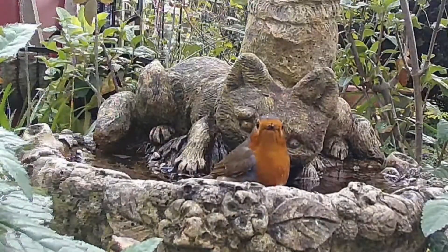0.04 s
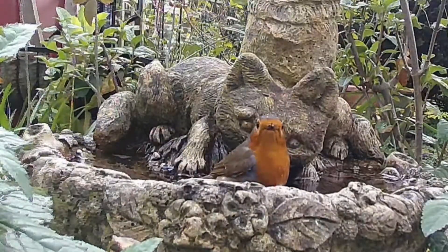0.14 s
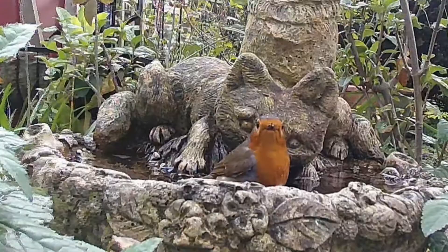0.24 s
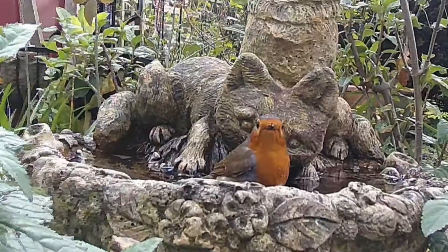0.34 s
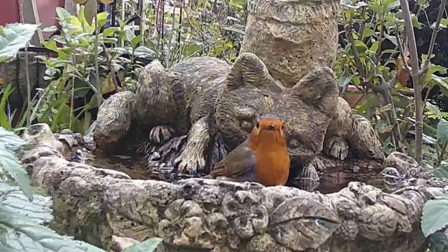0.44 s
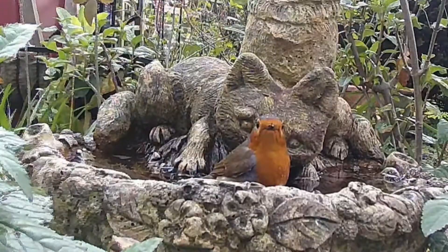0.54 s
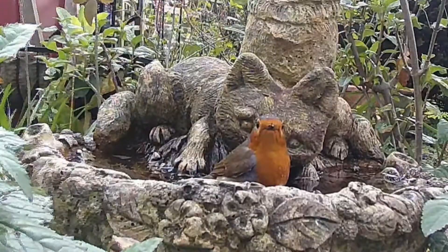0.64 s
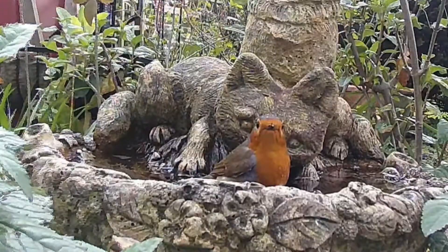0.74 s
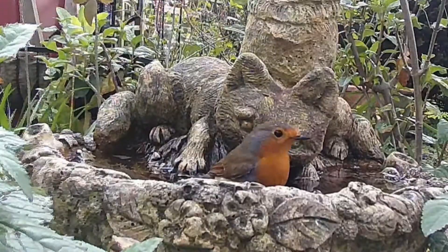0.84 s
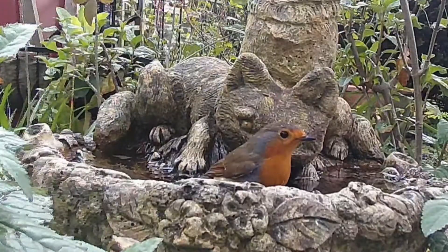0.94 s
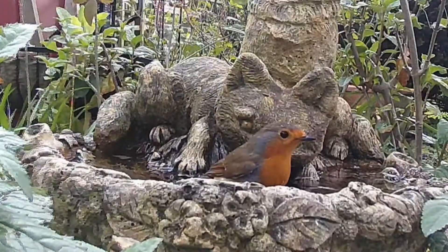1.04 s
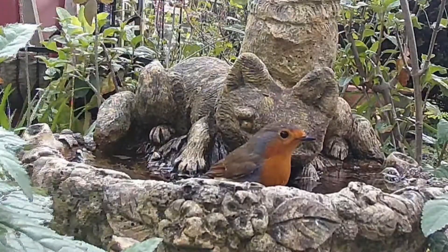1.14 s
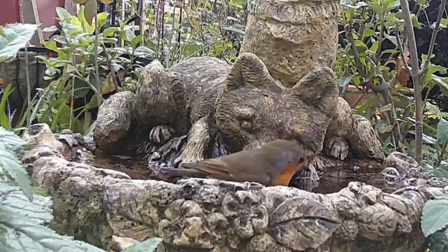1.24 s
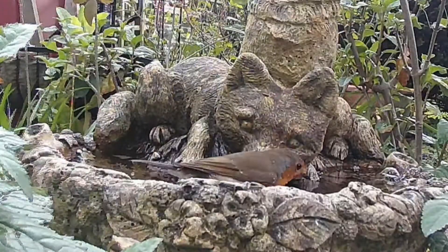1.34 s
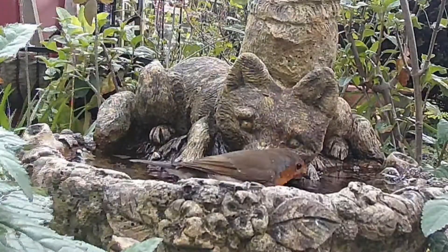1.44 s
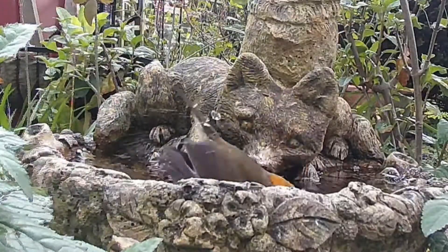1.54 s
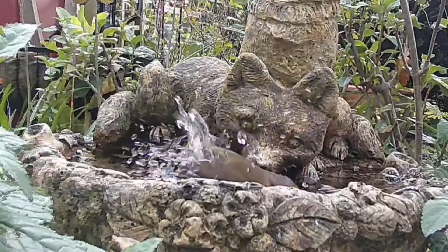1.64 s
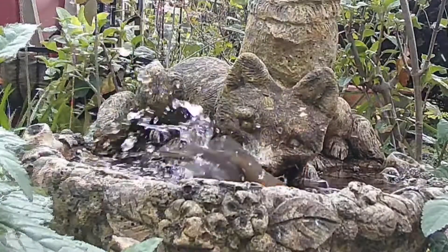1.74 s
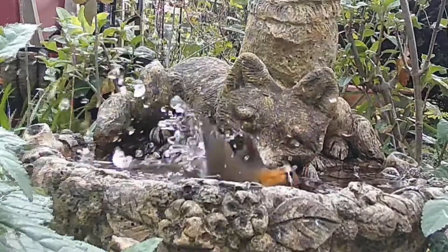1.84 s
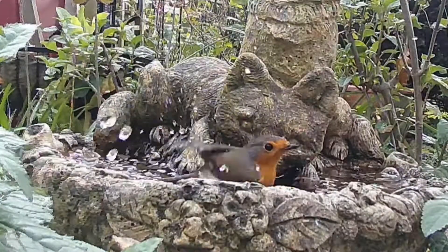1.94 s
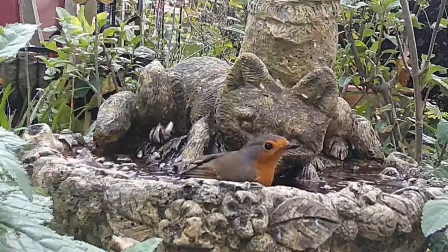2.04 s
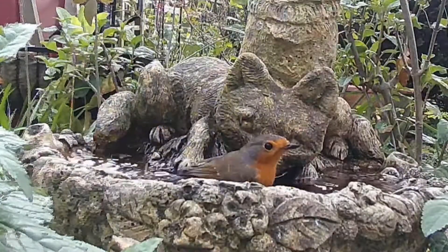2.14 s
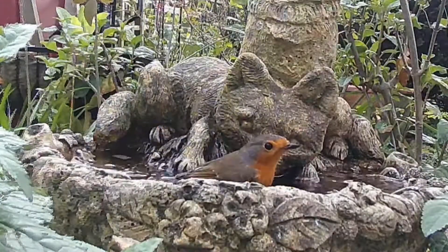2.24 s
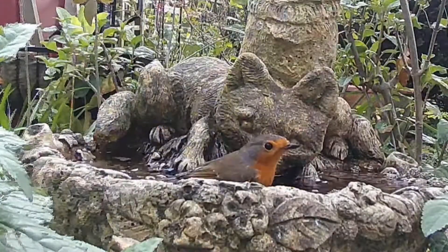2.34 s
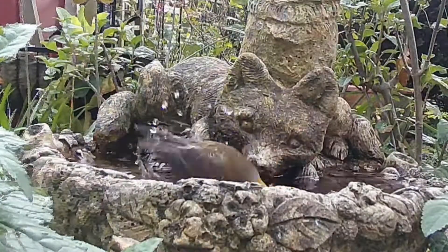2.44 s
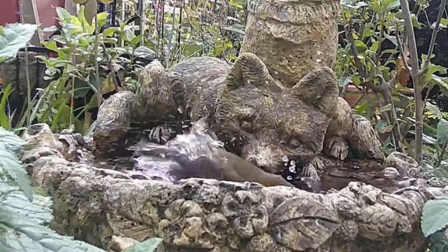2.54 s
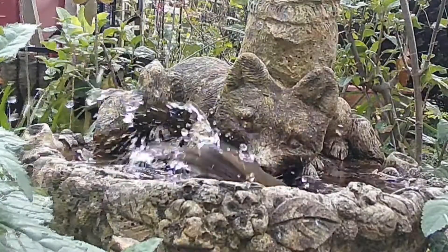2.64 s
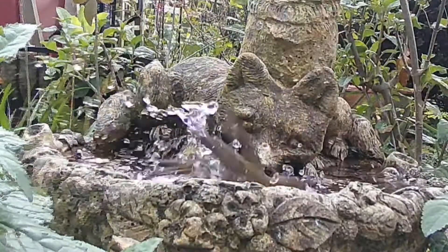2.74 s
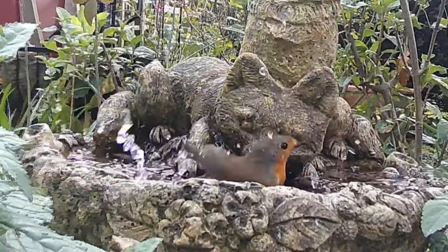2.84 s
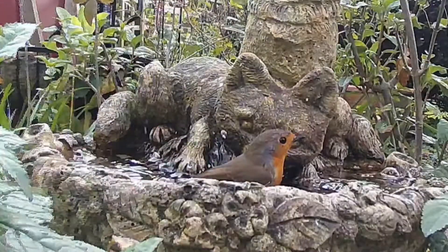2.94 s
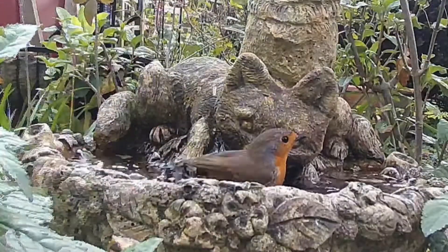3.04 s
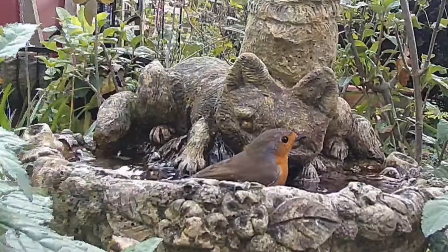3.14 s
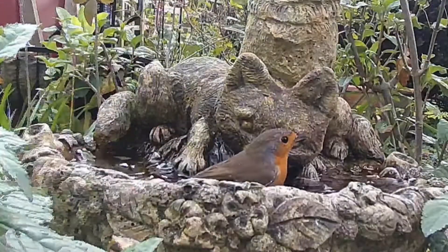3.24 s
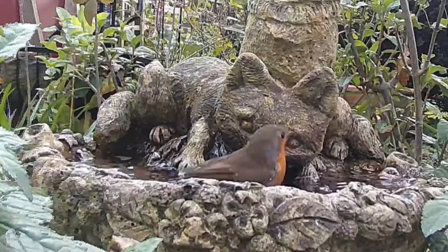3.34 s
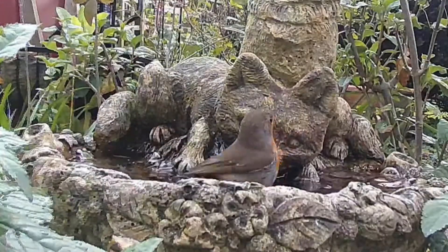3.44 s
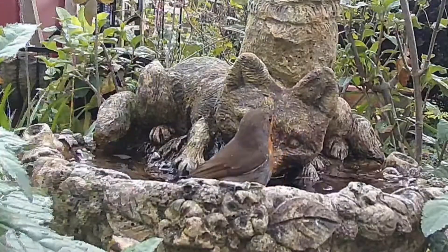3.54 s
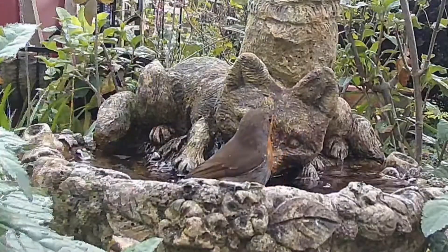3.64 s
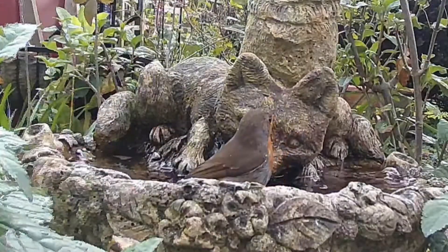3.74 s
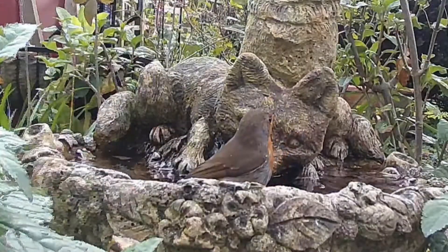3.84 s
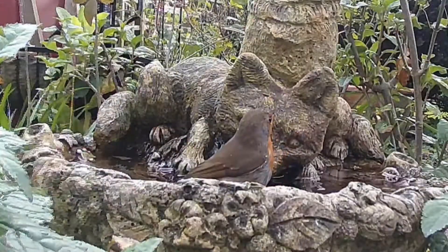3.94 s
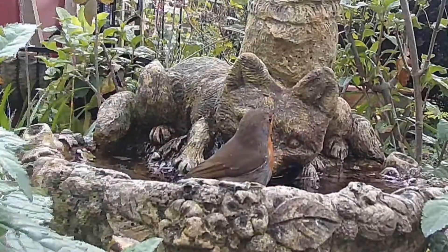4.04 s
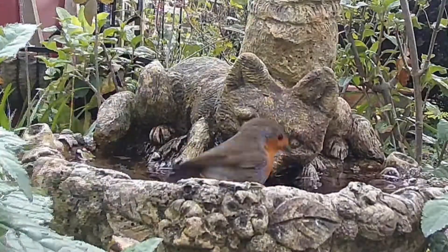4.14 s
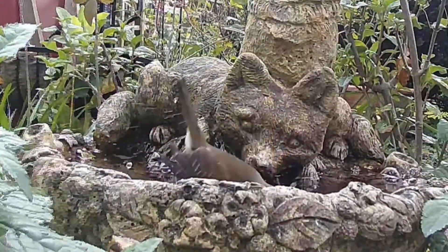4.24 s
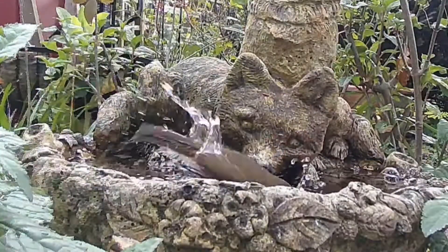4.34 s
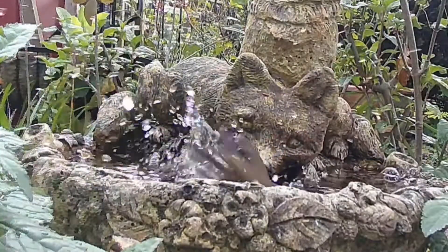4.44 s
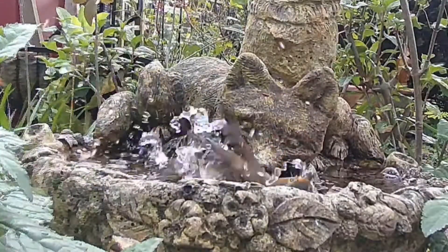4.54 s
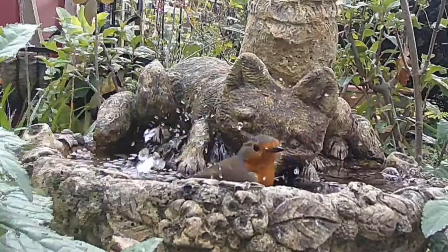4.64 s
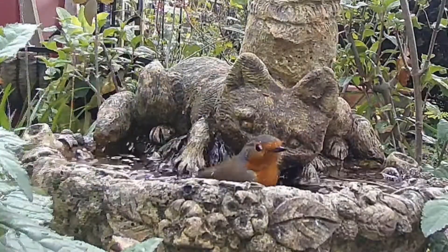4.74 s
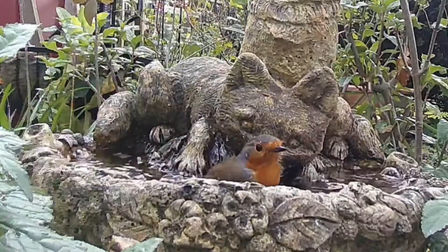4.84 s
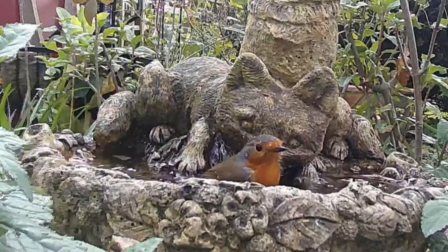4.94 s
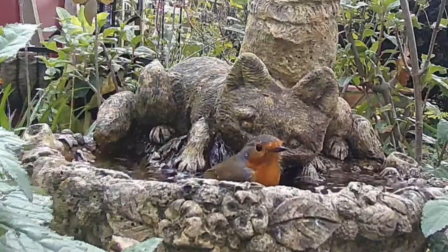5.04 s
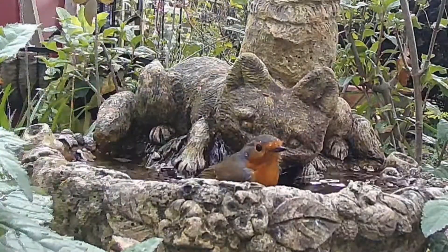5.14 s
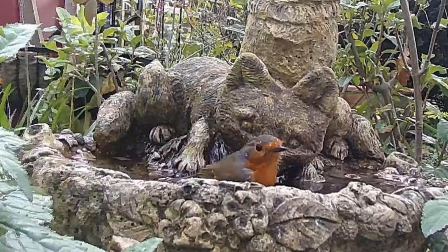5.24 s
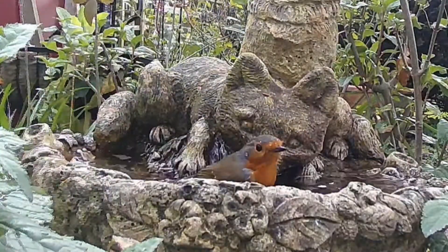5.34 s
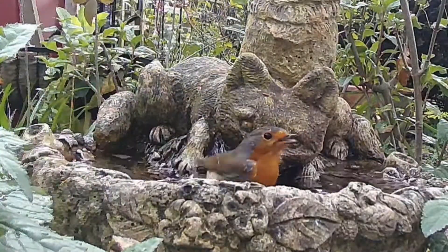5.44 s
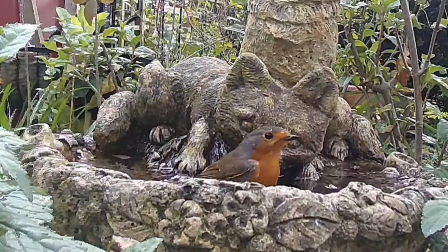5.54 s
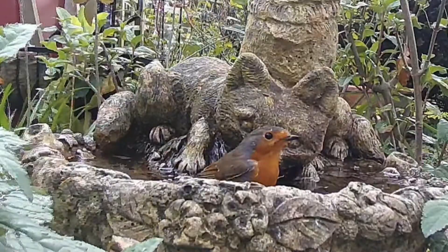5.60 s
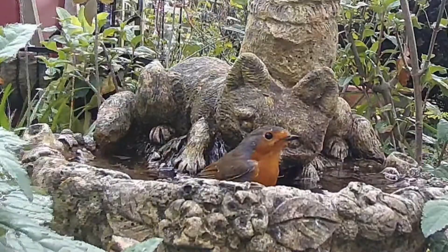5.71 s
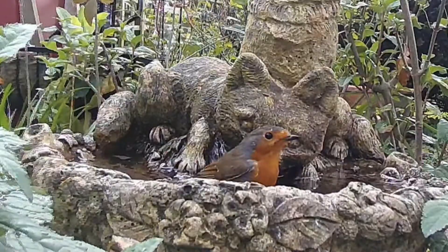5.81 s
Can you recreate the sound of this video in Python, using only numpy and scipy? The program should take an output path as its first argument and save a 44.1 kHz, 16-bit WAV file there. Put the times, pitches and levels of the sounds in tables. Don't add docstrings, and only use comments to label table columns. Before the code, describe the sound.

A garden bird bath heard through a small camera microphone with muffled highs and faint hiss. Low traffic drone and wind rumble continue throughout. From 0 to 1.4 s thin high birds twitter, rasp and whistle, with a tiny click at 0.3 s; a distant engine climbs in revs. At about 1.55-2.1 s the close bird flutters in water: rapid soft slaps, ringing bubbles, fine spray and plinking drops. A second flurry comes at 2.5-3.1 s, while the engine shifts and drops away near 3 s, leaving a faint rising whine. Distant chirps and harsh notes stand out at 3.2-3.7 s, lightly echoed. The third and strongest splash runs from 4.2 to 4.85 s, with rising plops and a deeper gulp. Wind buffets hardest from about 4.4 to 5.4 s. Afterwards only stray drops remain, with sparse faint twitters and a far idling engine swelling near 5.7 s.

```python
import sys
import numpy as np
from scipy import signal
from scipy.fft import rfft, irfft, next_fast_len
from scipy.io import wavfile
from scipy.ndimage import uniform_filter1d, map_coordinates

SR = 44100
rng = np.random.default_rng(int(sys.argv[2]) if len(sys.argv) > 2 else 0)


def natural_amplitude(level_db):
    exponent = np.asarray(level_db, float) / 20
    return 10 ** exponent


def wav_record(signal):
    frames = np.transpose(np.atleast_2d(signal))
    bounded = np.clip(frames, -1, 1)
    quanta = np.round(bounded * 32767).astype(np.int16)
    wavfile.write(sys.argv[1], SR, quanta)


N = 258867

# start_s, rise_s, hold_s, fall_s, wash level_db
BOUTS = [
    (1.547, 0.058, 0.32, 0.18, -67.5),
    (2.49, 0.056, 0.26, 0.29, -69),
    (4.213, 0.24, .36, 0.18, -66.5),
]
# start_s, level_db, trapped bubble pitch_hz, treble_db
WING_SLAPS = [(1.671, -52, 1630, -82), (1.6768, -50, 1520, -70), (1.69, -43, 1790, -72),
              (1.757, -51, 1990, -73), (1.771, -47.5, 1630, -73), (1.8177, -59, 3293, -83),
              (1.85, -47, 1920, -77), (1.8965, -61, 3198, -76), (1.916, -49, 1580, -71),
              (1.931, -48, 2801, -74), (2.312, -56.5, 3270, -76), (2.509, -48.5, 3000, -79),
              (2.585, -45.5, 1191, -73), (2.681, -44.5, 1860, -62), (2.723, -51, 3200, -75),
              (2.8122, -47, 3300, -67), (2.837, -51, 3095, -78), (2.9334, -55, 3220, -82),
              (2.9671, -52, 1271, -77), (4.368, -53, 1611, -74), (4.4695, -44, 1820, -78),
              (4.551, -40.5, 1730, -77), (4.6027, -45.5, 2000, -68), (4.635, -50, 3000, -76),
              (4.657, -52, 3300, -78), (4.693, -47, 900, -72), (4.7374, -41.5, 3000, -73),
              (4.7772, -50.5, 1450, -72), (4.845, -51.5, 1870, -83), (5.293, -58, 3300, -76)]
# start_s, level_db
DRIPS = [(1.807, -58), (1.7, -49), (2.539, -47.5), (2.6, -43), (2.758, -50), (2.6, -52), (2.848, -52),
         (2.868, -45), (2.734, -43), (1.975, -53), (4.328, -53), (2.979, -55), (2.987, -59), (3.024, -63),
         (3.9, -55), (4.345, -49), (4.451, -57), (4.466, -59), (4.57, -47), (4.607, -48), (4.802, -50.5),
         (1.774, -50), (1.856, -49), (1.5, -48)]
# start_s, peak level_db, pitch_hz
BUBBLES = [(1.6707, -52, 2490), (1.6781, -41.5, 3090), (1.679, -39, 2660), (1.704, -50, 3080),
           (1.756, -48, 2920), (1.772, -45, 2530), (1.7966, -46, 3140), (1.85, -39, 3170),
           (1.855, -41, 2630), (1.867, -47, 3060), (1.8529, -49, 1900), (1.9533, -51, 3160),
           (1.9673, -49, 2900), (2.589, -42.5, 2530), (2.6138, -46, 1630), (2.6144, -50, 3170),
           (2.6822, -43, 3150), (2.6845, -46, 1170), (2.6987, -36, 3010), (2.808, -47, 2660),
           (2.847, -44.5, 2840), (2.8726, -41, 3150), (4.371, -46.5, 2570), (4.4104, -43, 3160),
           (4.452, -53, 2650), (4.602, -47, 2360), (4.634, -40, 3270), (4.6405, -47, 3050),
           (4.777, -47, 3380)]
# start_s, peak level_db, pitch_hz
MORE_BUBBLES = [(1.838, -52, 2700), (1.844, -52, 1700), (1.936, -52, 1720), (1.938, -52, 3100),
                (1.993, -52, 3310), (1.702, -53, 1700), (1.612, -54, 2700), (1.63, -56, 3050), (2.518, -52, 1800),
                (2.541, -53, 1800), (2.551, -54, 3100), (2.577, -54, 3000), (2.634, -59, 2980),
                (2.671, -53, 2650), (2.758, -52, 2250), (2.821, -51, 1750), (2.979, -53, 1900), (2.969, -51, 950),
                (3.025, -55, 3400), (4.346, -54, 2700), (4.38, -54, 2600), (4.466, -52, 2500), (4.471, -52, 3180),
                (4.575, -54, 2300), (4.611, -48, 1700), (4.622, -48, 2700), (4.632, -52, 1890),
                (4.696, -48, 1900), (4.79, -54, 3100), (4.801, -53, 3300), (4.555, -53, 1000)]
# start_s, peak level_db, pitch_hz, t60_s, pitch rise (share)
DEEP_BUBBLES = [
    (1.644, -51, 1780, .03, .05),
    (1.919, -48.5, 2300, .02, .15),
    (1.9766, -43.5, 2130, 0.016, 0.05),
    (2.735, -40.5, 2430, 0.018, 0.43),
    (4.3293, -38.5, 2840, 0.0096, .4),
    (4.4059, -39, 2510, 0.018, 0.46),
    (4.5105, -42, 2150, 0.018, 0.5),
    (4.515, -42, 2570, 0.022, 0.35),
    (4.739, -43, 1270, 0.037, 0.46),
    (4.748, -52, 1460, 0.07, .08),
]
# start_s, peak level_db
POPS = [(1.5721, -55), (1.597, -56), (1.6705, -52), (1.679, -47), (1.7705, -51), (1.853, -48),
        (1.9175, -51), (1.931, -51), (1.967, -53), (1.9935, -53), (2.0277, -50), (2.052, -56), (2.511, -52),
        (2.6004, -48), (2.848, -51), (2.7237, -51), (2.8125, -50), (2.9337, -52), (2.968, -50),
        (3.069, -55), (4.3697, -48), (4.452, -51), (4.3285, -50), (4.4055, -50), (4.5105, -50),
        (4.5511, -45), (4.6035, -47), (4.6938, -44), (4.7384, -45), (4.7795, -48), (4.8445, -51),
        (5.5108, -54)]
# start_s, peak level_db, pitch_hz, t60_s
STONE_CLICKS = [
    (1.8172, -61, 3950, .006),
    (1.8971, -60, 5900, .003),
    (2.062, -74, 5800, .012),
    (2.7233, -56, 4600, .003),
    (4.3225, -68, 4400, .010),
    (4.6568, -63, 4250, .011),
    (4.6035, -70, 6300, .006),
    (4.6345, -71, 6100, .006),
    (4.779, -59, 3950, .006),
    (2.9332, -66, 4100, .003),
]
# frequency_hz, level_db
SLAP_BODY = [(300, -18), (900, -5), (2000, -2), (3300, 5), (3900, -22), (4500, -43), (8000, -120)]
SLAP_TREBLE = [(1000, -120), (3000, -18), (3900, 5), (4800, -11), (7500, -9.5), (8500, -26.5),
               (16000, -35.5)]
POP_SPECTRUM = [(250, -20), (600, 17), (2000, 19), (3400, 20), (3900, 6), (4600, -14), (8000, -20),
                (9000, -60)]
WASH_SPECTRUM = [(300, -37.5), (600, -0.5), (1200, -6), (2000, -5), (3200, 0.5), (3700, -7), (4300, -31.5),
                 (8000, -120)]
# frequency_hz, level_db
MIC = [(10, -4), (2000, 3), (3200, 2), (3600, -1.5), (3900, -10.5), (4600, -22.5), (8000, -32),
       (20000, -51)]

# start_s, length_s, pitch_hz, level_db
SONG = [(0.117, 0.069, 3260, -63), (.24, 0.05, 3280, -67), (0.327, .05, 3230, -66.5),
        (0.408, 0.036, 3230, -70), (.465, 0.047, 3330, -63), (.545, 0.037, 3280, -71),
        (.595, .065, 3290, -71), (.675, 0.047, 3300, -67.5), (.745, 0.082, 3220, -70),
        (1.087, 0.053, 3290, -68.5), (1.15, .04, 3350, -72), (3.74, 0.038, 3200, -74),
        (4.075, .04, 3080, -70), (5.695, 0.032, 3190, -67), (5.735, 0.052, 3200, -65),
        (5.815, 0.025, 3170, -68)]
# start_s, length_s, pitch_hz, level_db
HARSH_NOTES = [
    (.028, 0.014, 3210, -67),
    (.047, 0.012, 3305, -66),
    (.12, 0.028, 2680, -67),
    (.675, 0.05, 3480, -73),
    (1.235, 0.035, 3090, -73),
    (3.245, 0.064, 2790, -71),
    (3.515, 0.025, 3180, -60),
    (3.613, 0.021, 2800, -61.5),
    (3.68, .025, 3280, -72),
    (3.9, 0.084, 2820, -74.5),
]
# start_s, length_s, start_hz, end_hz, level_db
WHISTLES = [(.275, 0.071, 5100, 5450, -87), (.335, 0.06, 5700, 5660, -87), (.41, .06, 5640, 5610, -97),
            (0.705, .13, 3980, 3930, -89), (0.87, .025, 2900, 3900, -61), (1.2, .065, 3800, 2880, -68),
            (1.205, .05, 3500, 3050, -68), (1.17, .045, 4120, 4150, -84), (1.195, .09, 2700, 3150, -74),
            (1.2, .04, 2120, 1900, -75), (.265, 0.055, 3400, 3560, -71), (.31, .07, 3500, 3450, -78),
            (.67, .05, 2900, 3200, -72), (1.24, 0.096, 3570, 3520, -69), (1.335, .07, 3550, 3550, -71),
            (1.42, 0.11, 3660, 3640, -74), (0.57, 0.11, 2770, 3100, -77), (1.35, .045, 2480, 2460, -68),
            (1.4, .025, 2440, 2420, -71), (1.8, .07, 3020, 2960, -72), (0.375, 0.11, 2260, 2170, -75),
            (5.125, .04, 5880, 5720, -82), (5.155, .06, 5720, 5680, -80), (5.21, .065, 5680, 5720, -88),
            (5.18, .055, 5620, 5450, -89), (5.445, .045, 4540, 4580, -85), (5.68, 0.04, 4800, 5100, -89),
            (5.71, .04, 4900, 4800, -89), (5.59, .05, 5930, 5880, -94), (5.76, .07, 5100, 5150, -95),
            (5.9, .05, 4100, 4150, -77), (5.78, .03, 3100, 3500, -76), (5.545, .03, 3100, 3050, -71),
            (.885, .025, 4200, 6000, -89), (.02, .02, 4550, 4600, -88), (5.843, .022, 5700, 4570, -88)]
# start_s, start_hz, level_db
CHIRPS = [
    (.815, 2740, -64),
    (3.378, 2815, -56.5),
    (3.433, 2850, -56),
    (3.445, 3150, -70),
    (3.505, 2850, -64),
    (3.51, 2400, -68),
    (3.37, 2500, -68),
    (3.592, 2800, -61),
    (5.116, 2900, -61),
    (5.105, 2300, -72),
]
# start_s, length_s, level_db
CHORUS = [
    (.1, 0.85, -71),
    (1.08, 0.54, -75),
    (3.0, 0.28, -71),
    (3.25, 0.74, -72),
    (4.12, 0.23, -69),
    (4.8, 0.45, -74.5),
    (5.28, 0.11, -70.5),
    (5.5, 0.47, -74.5),
]
# start_s, length_s, level_db
HIGH_VOICES = [
    (0, 0.18, -86),
    (.7, 0.24, -92),
    (1.12, 0.28, -91),
    (3.0, 0.067, -88),
    (3.3, 0.62, -88.5),
    (4.17, 0.11, -86),
    (4.8, .1, -93),
    (5.28, .1, -84),
    (5.48, 0.13, -83),
    (5.75, 0.13, -88),
]

# time_s, firing_hz, load level_db
ENGINE = [
    (0.0, 55.8, -44),
    (0.58, 60.17, -47.5),
    (1.14, 66.54, -50),
    (1.34, 73.55, -48.5),
    (1.87, 71.15, -51),
    (2.55, 76.08, -49.5),
    (2.9, 56.62, -48.5),
    (3.2, 46.3, -57),
]
# time_s, pitch_hz, level_db
EXHAUST = [
    (0.5, 120.7, -76),
    (0.646, 124.1, -52.5),
    (1.458, 138.1, -57.5),
    (1.55, 141.4, -74),
    (2.15, 146.3, -75),
    (2.3, 149.2, -60.5),
    (2.5, 153.5, -61),
    (2.6, 153, -71),
]
# time_s, pitch_hz, level_db
WHINE = [
    (2.45, 199.8, -70),
    (2.771, 203, -63.5),
    (3.022, 238, -65.5),
    (3.2, 248.7, -61),
    (3.45, 254, -70.5),
    (3.851, 275.6, -67),
    (3.95, 272, -74),
]
# time_s, firing_hz, level_db
IDLE = [
    (4.701, 38.3, -44.5),
    (5.6, 44.6, -46),
    (5.7, 45.4, -38.5),
    (5.78, 46, -39.5),
    (5.87, 44.2, -42),
]
# time_s, level_db
TRAFFIC = [(0, -61), (.6, -62), (2.1, -63), (3.1, -63), (3.9, -64), (4.5, -61.5), (5.3, -63.5),
           (5.87, -61.5)]
# frequency_hz, level_db per Hz
BOOM = [(34, -34), (58, -0.5), (115, -19), (150, -37), (250, -120)]
DRONE = [(62, -26.5), (105, 0), (161, -6), (205, -7), (281, -13), (380, -25.5), (490, -52), (840, -120)]
ROAD = [(180, -35), (300, -5.5), (407, -5), (552, -4.5), (642, -5), (724, -3.5), (1050, -5), (1320, -9),
        (1710, -12), (2560, -17), (3180, -14), (3660, -22.5), (4040, -33), (5250, -51.5), (8890, -120)]

# time_s, level_db
WIND = [(0.0, -51.5), (0.83, -43.5), (0.9, -64.5), (0.95, -45), (2.93, -50.5), (2.96, -38), (3.22, -49),
        (3.32, -40.5), (3.84, -42.5), (4.35, -31), (4.4, -47.5), (4.48, -23), (4.67, -26.5), (4.72, -35.5),
        (5.2, -28.5), (5.52, -44), (5.8, -41), (5.87, -45.5)]
# frequency_hz, level_db per Hz
BUFFET = [(4.7, -23.5), (8.0, -3.5), (22, 1), (36, -4.5), (47, -30), (79, -120)]
RUMBLE = [(19, -29), (32, -2), (41, -15), (62, -16), (81, -43.5), (140, -120)]
# frequency_hz, level_db per Hz
HISS = [(3000, -51), (4200, 3), (5000, 0.5), (5800, 3), (7200, 8), (7900, 4), (8600, -7.5), (15400, -8.5),
        (16200, -32.5), (20000, -27.5)]
# start_s, step level_db, recovery_s
SPLICE = (.32828, -37, 0.015)
# end value (full scale), rise_s
LAST_SWING = (.0138, .003)


def splashes():
    stir = bathing()
    slaps, thrown = slaps_and_drips()
    spray = (natural_amplitude(-12.5) * stir + thrown) * fine_spray()
    ringing = coloured(trapped_bubbles(stir) + spray, MIC)
    return slaps + ringing + pops() + wash(stir) + stone_clicks()


def bathing():
    t = np.arange(N) / SR
    stir = np.zeros(N)
    for s, rise, hold, fall, db in BOUTS:
        corners_s = np.cumsum([s, rise, hold, fall])
        level_db = np.interp(t, corners_s, db - 4.5 * np.array([1, 0, 0, 1]))
        stir += natural_amplitude(level_db) * during([[s], [s + rise + hold + fall]], 0.039)
    return stir


def slaps_and_drips():
    slap_t60_s, drip_t60_s, thrown_t60_s, contact_s = 0.011, 0.004, 0.059, 0.0004
    t = np.arange(SR // 5) / SR
    body, treble, thrown = np.zeros((3, N + SR))
    hits = [(s, db, treble_db, slap_t60_s) for s, db, _, treble_db in WING_SLAPS]
    hits += [(s, db, db - 28, drip_t60_s) for s, db in DRIPS]
    for s, db, treble_db, t60 in hits:
        noise = rng.choice([-1, 1], size=len(t)) * 1.73
        burst = natural_amplitude(-60 * t / t60) * noise * (1 - np.exp(-t / contact_s))
        span = slice(round(s * SR), round(s * SR) + len(t))
        treble[span] += natural_amplitude(treble_db + 9.0) * burst
        body[span] += natural_amplitude(db + 2.5) * burst
        thrown[span] += natural_amplitude(db - 20.5 - 60 * t / thrown_t60_s)
    return coloured(body[:N], SLAP_BODY) + coloured(treble[:N], SLAP_TREBLE), thrown[:N]


def trapped_bubbles(stir):
    strays_per_s = 55
    place, softness, bigness = rng.random((3, round(strays_per_s * N / SR)))
    stray_db = 20 * np.log10(stir[(place * N).astype(int)] + 1e-9) + 8 - 6 * softness
    strays = np.transpose([place * N / SR, stray_db, 3400 * 0.42 ** (bigness ** 2)])
    s, db, hz = np.vstack([np.array(WING_SLAPS)[:, :3], BUBBLES, MORE_BUBBLES, strays]).T
    t60 = 0.01 * (hz / 2000) ** -0.047
    ringing = bubbles(s, db, hz, t60, rise=0.041 * hz / 1000, attack=0.00011)
    return ringing + bubbles(*np.transpose(DEEP_BUBBLES), attack=0.0003)


def fine_spray():
    place, size, loud, life = rng.random((4, 9000))
    hz = 3900 * 0.25 ** (size ** 1.4)
    db = -3.5 * np.log(0.03 + loud)
    t60 = (3 + 12 * life) / hz
    return unit(bubbles(place * N / SR, db, hz, t60, rise=0.084, attack=0.00009, size=500))


def pops():
    s, db = np.transpose(POPS)
    return coloured(np.bincount(np.round(s * SR).astype(int), natural_amplitude(db), N), POP_SPECTRUM)


def wash(stir):
    flutter = natural_amplitude(3.2 * wobble(160))
    return stir * unit(flutter * rush(WASH_SPECTRUM, patchy_db=1.8))


def stone_clicks():
    return bubbles(*np.transpose(STONE_CLICKS), rise=0.03, attack=0.0003)


def bubbles(s, db, hz, t60, rise, attack, size=None):
    t = np.arange(SR // 25)[:size] / SR
    life = np.clip(t60, 0.002, 0.07)[:, None]
    pitch = hz[:, None] * (1 + np.reshape(rise, (-1, 1)) * (t / life - 0.1))
    envelope = natural_amplitude(db[:, None] - 60 * t / life) * (1 - np.exp(-t / attack))
    ring = envelope * np.sin(2 * np.pi * np.cumsum(pitch, axis=1) / SR)
    at = np.round(s * SR).astype(int)[:, None] + np.arange(len(t))
    return np.bincount(at.ravel(), ring.ravel(), N + SR)[:N]


def garden(x, t60):
    t = np.arange(SR // 4) / SR
    tail = natural_amplitude(-60 * t / t60) * rng.standard_normal(len(t))
    return signal.fftconvolve(x, tail / np.linalg.norm(tail))[:N]


def far_calls():
    chirp_s, chirp_rise = 0.017, 1.3
    calls = WHISTLES + [(s, chirp_s, hz, hz * chirp_rise, db) for s, hz, db in CHIRPS]
    out = np.zeros(N + SR)
    waver_hz = np.pad(32 * wobble(110), (0, SR))
    for s, length, start_hz, end_hz, db in calls:
        u = np.arange(round(length * SR)) / (length * SR)
        span = slice(round(s * SR), round(s * SR) + len(u))
        hz = start_hz + (end_hz - start_hz) * u + waver_hz[span]
        swell = np.abs(np.sin(np.pi * u)) ** 0.7
        out[span] += natural_amplitude(db) * swell * np.sin(2 * np.pi * np.cumsum(hz) / SR)
    out = out[:N] * (1 + 0.3 * wobble(200))
    first_wall = natural_amplitude(-13.0) * np.roll(out, round(0.01 * SR))
    second_wall = natural_amplitude(-14.5) * np.roll(out, round(0.026 * SR))
    return out + first_wall + second_wall


def chorus():
    blur = unit(natural_amplitude(3 * wobble(30)) * narrow(3280 + 60 * wobble(8), width_hz=520))
    high = narrow(3950 + 120 * wobble(9.5), width_hz=640)
    crowd = natural_amplitude(-4.5) * phrases(CHORUS, 0.09) * blur + phrases(HIGH_VOICES, 0.03) * high
    song = notes(SONG, width_hz=160, fade=0.015, clear=0.52)
    return crowd + song + notes(HARSH_NOTES, width_hz=570, fade=0.008, clear=0.061)


def notes(rows, width_hz, fade, clear):
    glide = [(s + end * length, hz) for s, length, hz, db in rows for end in (0, 1)]
    hz = curves(glide)[0] + 20 * wobble(25)
    voice = clear * hum(hz, 0, unsteady_db=2.0) + (1 - clear) * narrow(hz, width_hz)
    return phrases([(s, length, db) for s, length, hz, db in rows], fade) * voice


def phrases(rows, fade):
    return sum(natural_amplitude(db) * during([[s], [s + length]], fade) for s, length, db in rows)


def engines():
    hz, load_db = curves(ENGINE)
    revving = hum(hz, load_db, unsteady_db=2.0)
    revving += hum(hz / 2, load_db - 1.5, unsteady_db=-2.5)
    out = during(ENGINE, 0.27) * revving
    for rows in (EXHAUST, WHINE, IDLE):
        out += during(rows, 0.21) * hum(*curves(rows), unsteady_db=-0.5)
    return out


def hum(hz, db, unsteady_db):
    level = np.sqrt(2) * natural_amplitude(db + unsteady_db * wobble(9.9))
    return level * np.sin(2 * np.pi * np.cumsum(hz) / SR)


def traffic():
    road_db = curves(TRAFFIC)[0]
    town = natural_amplitude(11) * rush(BOOM, patchy_db=-1.3) + natural_amplitude(4.5) * rush(DRONE, patchy_db=0.37)
    return natural_amplitude(following(road_db, 0.44)) * town + natural_amplitude(road_db) * rush(ROAD, patchy_db=0.8)


def wind():
    wind_db = curves(WIND)[0]
    rumble_db = following(wind_db, 0.79) - 7.5 + 0.5 * wobble(4.1)
    rumble = rush(RUMBLE, patchy_db=2.5)
    thud = natural_amplitude(-11) * rush(BOOM, patchy_db=1.0) + natural_amplitude(-18) * rush(DRONE, patchy_db=0.5)
    pressure = natural_amplitude(wind_db - 2) * rush(BUFFET, patchy_db=0.0) + natural_amplitude(rumble_db) * (rumble + thud)
    return 0.075 * np.tanh(pressure / 0.075)


def following(db, share):
    return db.mean() + share * (db - db.mean())


def unit(x):
    return x / np.sqrt(np.mean(x ** 2) + 1e-20)


def along(points, hz):
    f, v = np.transpose(points)
    return np.interp(np.log(hz + 1), np.log(f + 1), v)


def curves(rows):
    s, *cols = np.transpose(rows)
    return [np.interp(np.arange(N) / SR, s, c) for c in cols]


def during(rows, fade):
    t = np.arange(N) / SR
    inside_s = np.minimum(t - rows[0][0], rows[-1][0] - t)
    return np.clip((inside_s + fade / 2) / fade, 0, 1)


def wobble(rate):
    knots = rng.standard_normal(int(N * rate / SR) + 4)
    return map_coordinates(knots, [np.arange(N) * rate / SR])


def narrow(centre_hz, width_hz):
    turn = 2 * np.pi * np.cumsum(centre_hz + np.zeros(N)) / SR
    return unit(wobble(width_hz) * np.cos(turn) + wobble(width_hz) * np.sin(turn))


def coloured(x, spectrum):
    m = next_fast_len(N + 8192)
    gain = natural_amplitude(along(spectrum, np.fft.rfftfreq(m, 1 / SR)))
    return irfft(rfft(x, m) * gain, m)[:N]


def rush(spectrum, patchy_db):
    z = signal.stft(rng.standard_normal(N + 512), nperseg=512)[2]
    field = uniform_filter1d(rng.standard_normal(z.shape), size=6, axis=0)
    field = unit(uniform_filter1d(field, size=14, axis=1))
    patchy = signal.istft(z * natural_amplitude(patchy_db * field), nperseg=512)[1][:N]
    return unit(coloured(patchy, spectrum))


def scene():
    water, calls = splashes(), far_calls()
    near = water + natural_amplitude(-12) * garden(water, t60=0.075)
    far = calls + natural_amplitude(-7) * garden(calls, t60=0.12) + chorus()
    return (near + far + engines() + traffic() + wind())[None]


def top_cut(x):
    return signal.sosfilt(signal.butter(12, 15480, fs=SR, output="sos"), x)


def record(dry):
    s, db, recovery = SPLICE
    t = np.arange(N) / SR
    step = -natural_amplitude(db) * (t > s) * np.exp(-np.abs(t - s) / recovery)
    whistle = natural_amplitude(curves(WIND)[0] - 72.5) * narrow(11700, width_hz=82)
    hiss = natural_amplitude(-87) * rush(HISS, patchy_db=0.2)
    switch_on = 1 - np.exp(-t / 0.0012)
    sound = (dry + hiss + whistle + step) * switch_on
    pressure, rise = LAST_SWING
    swing = np.exp((t - t[-1]) / rise)
    mix = sound * (1 - swing) + pressure * swing
    return top_cut(mix)


dry = scene()
out = record(dry)
wav_record(out)
```